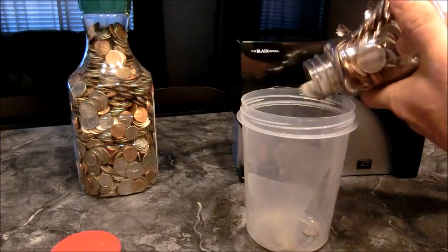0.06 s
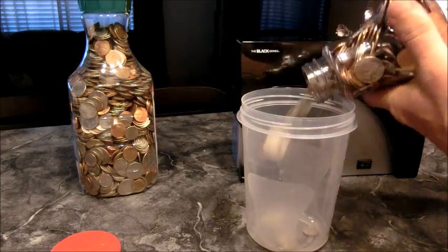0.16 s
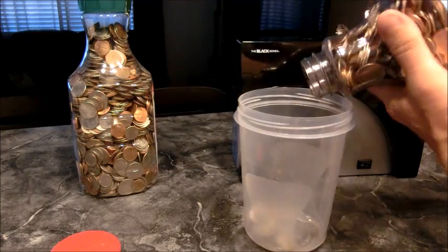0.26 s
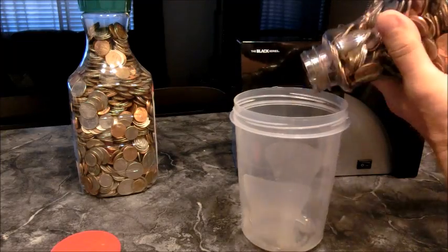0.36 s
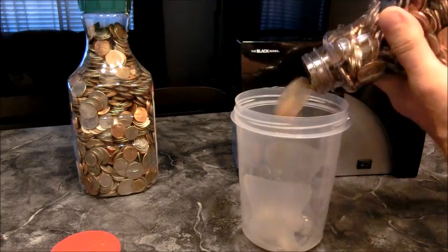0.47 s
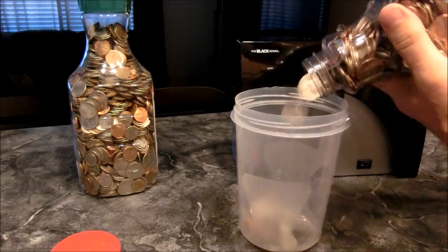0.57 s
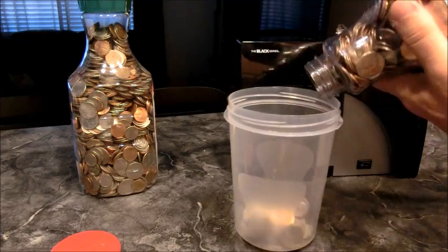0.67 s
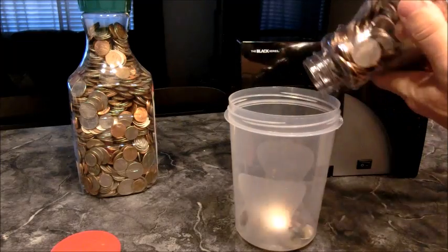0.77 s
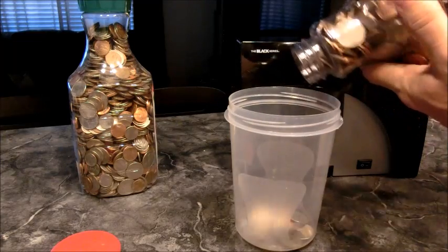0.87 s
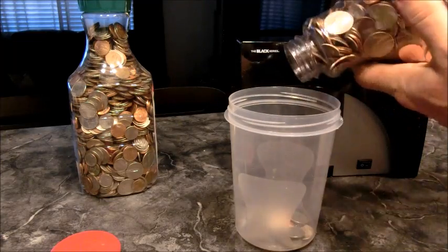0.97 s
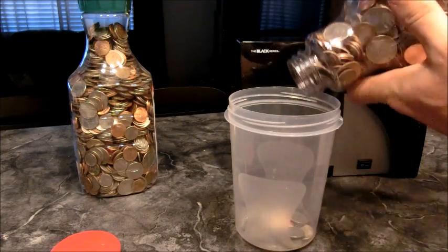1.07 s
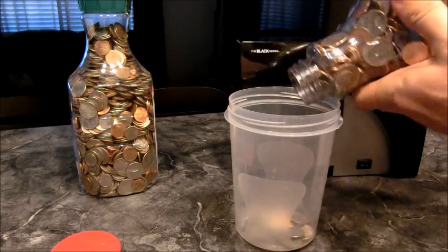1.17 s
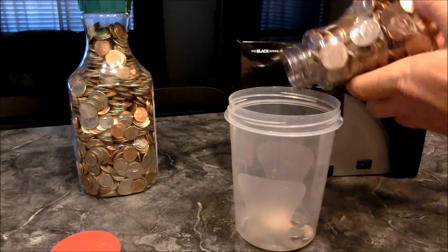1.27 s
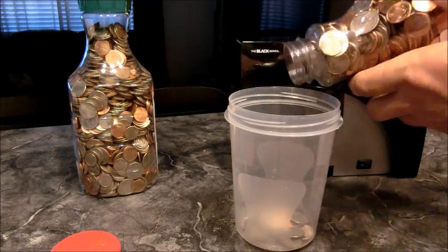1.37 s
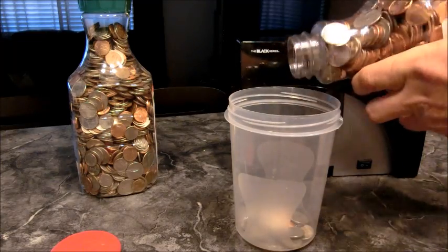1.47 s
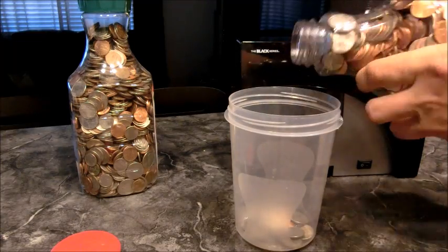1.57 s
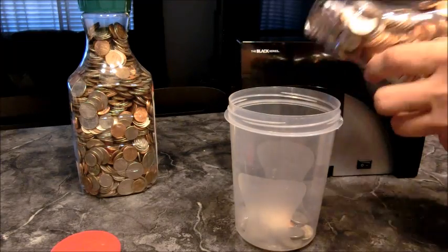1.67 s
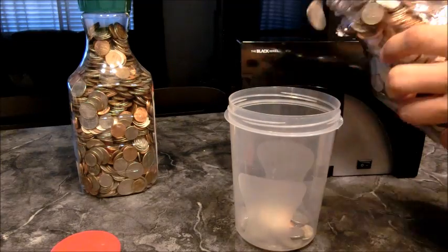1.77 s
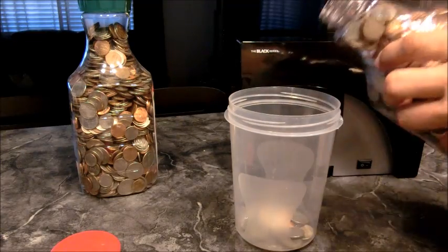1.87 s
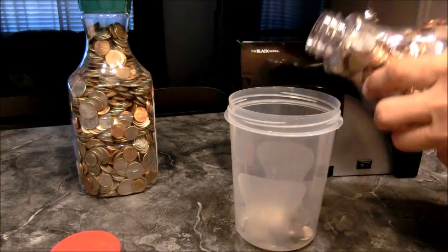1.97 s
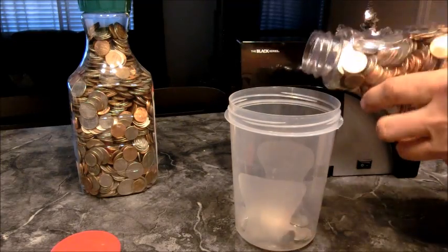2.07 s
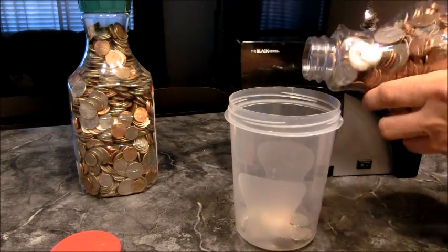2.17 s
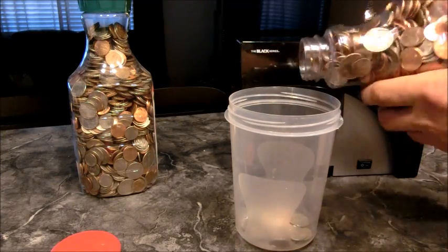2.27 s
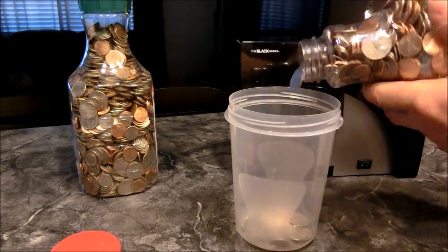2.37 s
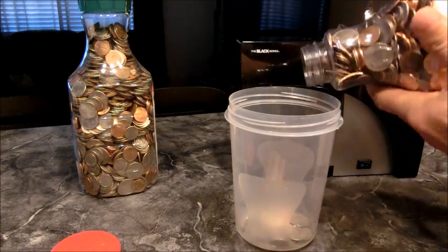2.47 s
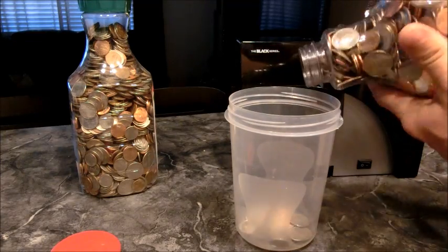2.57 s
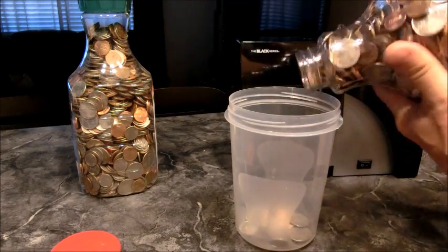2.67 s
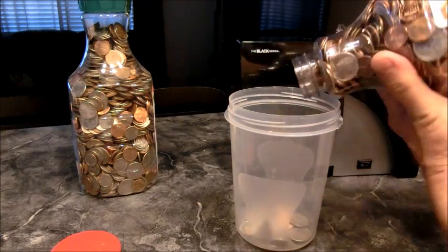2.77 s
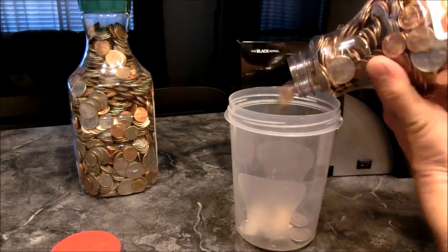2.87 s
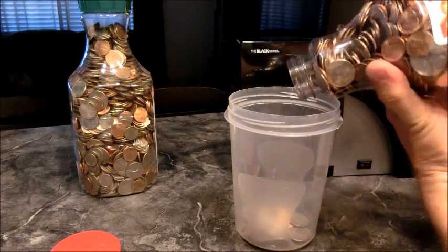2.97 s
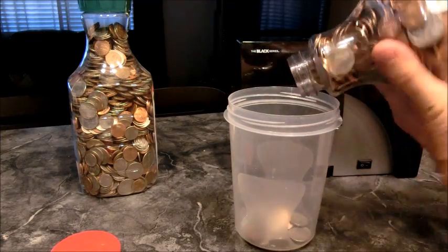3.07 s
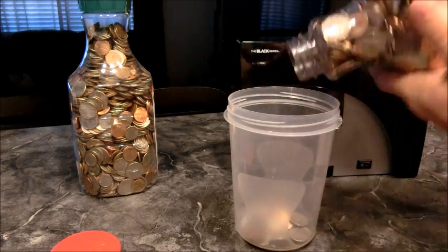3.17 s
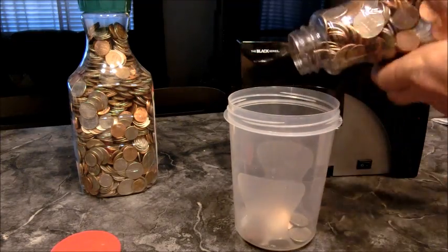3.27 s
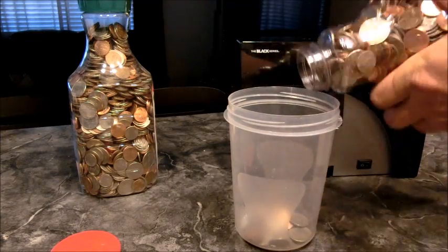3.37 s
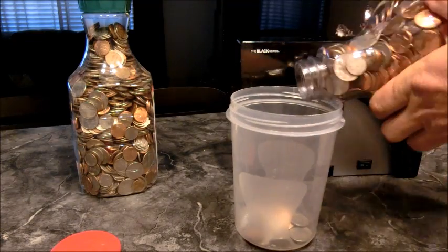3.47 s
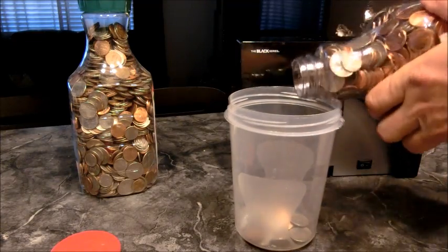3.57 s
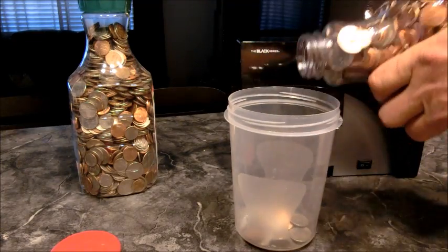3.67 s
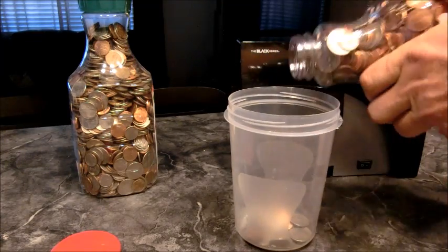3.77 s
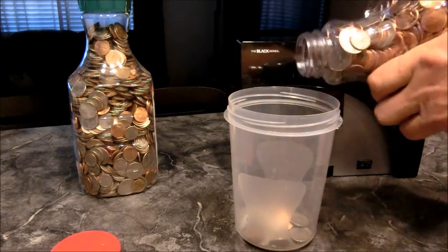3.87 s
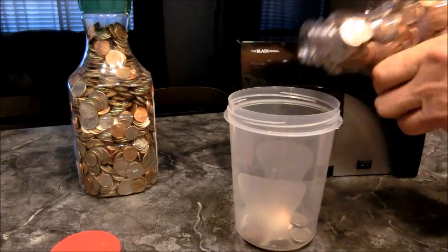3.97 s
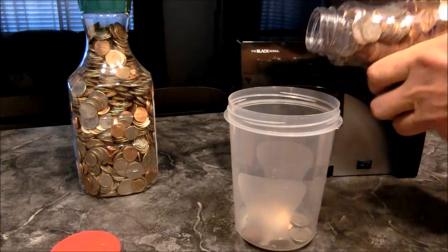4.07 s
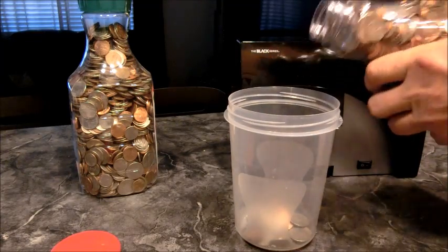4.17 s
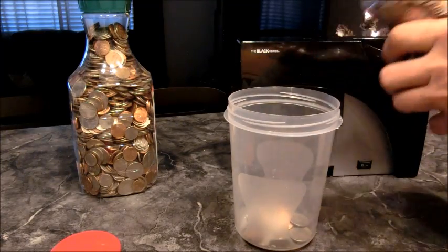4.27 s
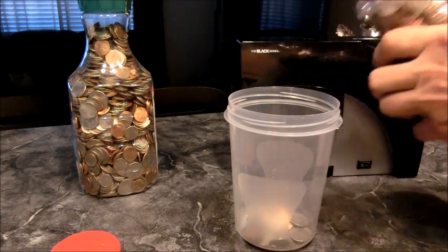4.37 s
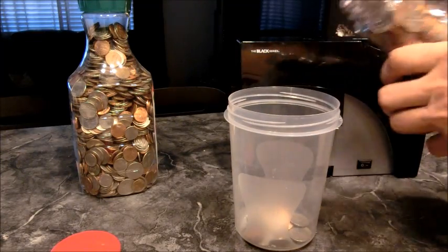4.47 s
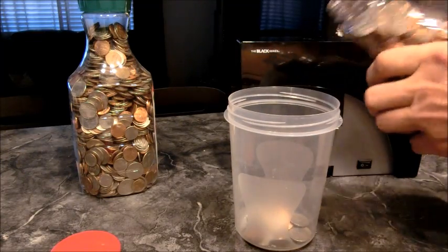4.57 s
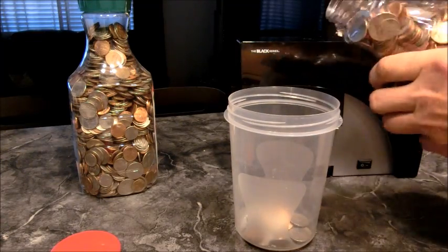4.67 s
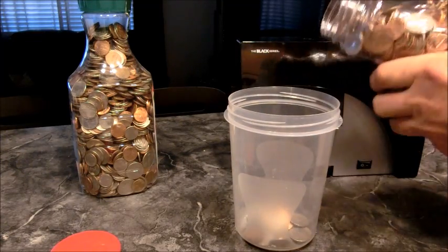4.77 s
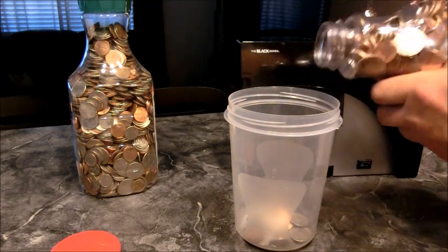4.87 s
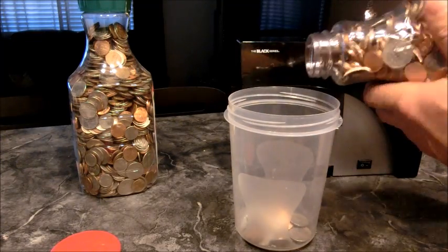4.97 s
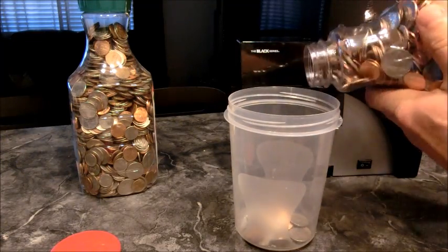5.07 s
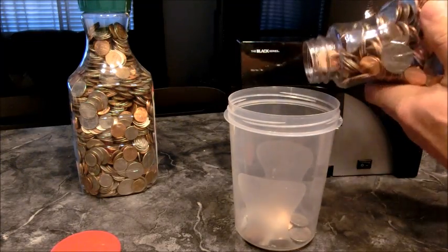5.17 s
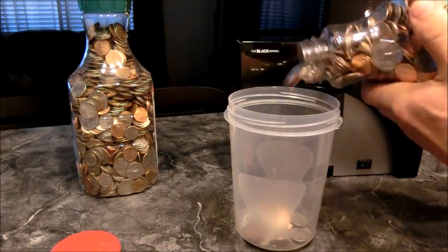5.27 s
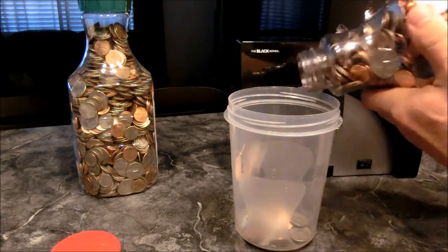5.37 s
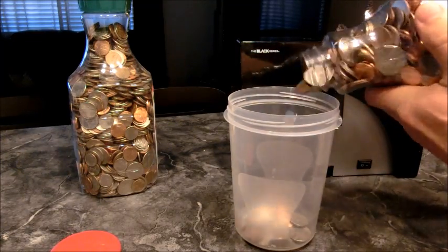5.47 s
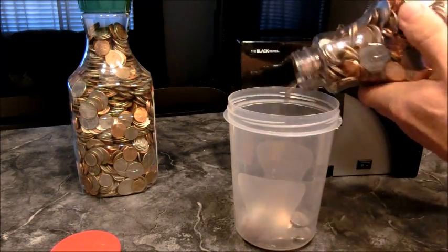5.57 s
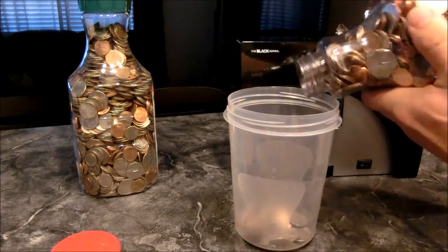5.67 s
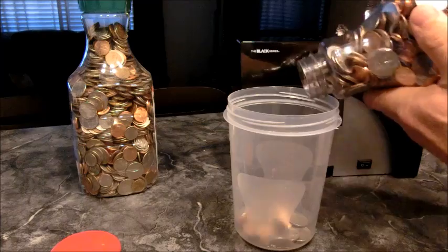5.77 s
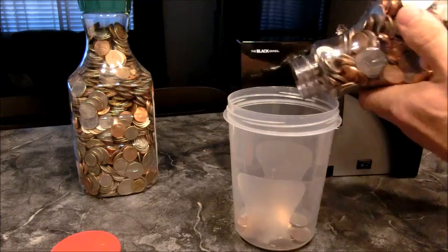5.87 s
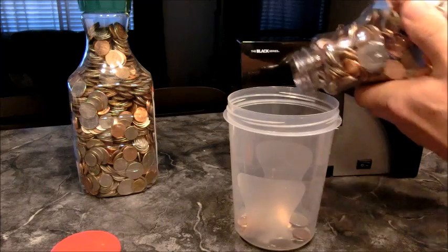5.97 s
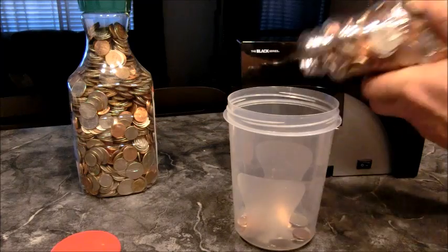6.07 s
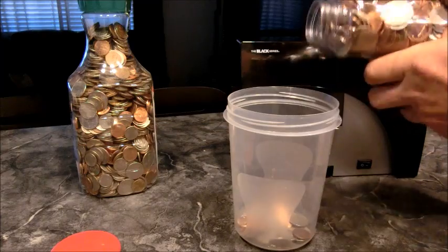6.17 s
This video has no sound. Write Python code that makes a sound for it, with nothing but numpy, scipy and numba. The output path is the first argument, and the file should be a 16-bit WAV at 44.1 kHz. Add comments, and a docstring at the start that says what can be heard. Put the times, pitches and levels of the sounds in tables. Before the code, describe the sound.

Close stereo sound in a small kitchen, with quick reflections, a short tail and very faint room noise. From 0 s packed coins grind in a plastic bottle with hard, pitched rim clanks; at about 0.24 s a loud cluster hits a plastic tub, bright clicks over a drum-like thud, then chatters with thin high ringing until about 0.95. Near quiet follows, with faint ticks from 1.15 and soft hollow sliding around 1.65-1.9. One sharp coin lands at 1.94. Light shifting leads to small drops at 2.5, 2.85 and 2.97-3.2. From 3.3 coins slide and knock in the bottle, growing to a dense rattle at 4.3-4.65, with a clank at 4.6. After a lull, rattling resumes at 4.95, clanks strongly at 5.17, and thumps the wall. A loud spill at 5.41 scatters clicks and rings until 5.83, then quiet sliding fades out.

```python
"""Coins shaken from a bottle into a tub

Coins are shaken in spurts from a plastic bottle into a plastic tub on a kitchen counter, close to a stereo phone.
Contacts mix damped noise bursts (metal click, wall clack) with decaying modes (thud, wall, thin coin ring).
Coins land, chatter and settle in the tub; between spurts the packed coins slide and knock in the bottle.
Rims clank, the load thumps the wall and free coins sing, over quick echoes, a short room tail and faint noise."""
import sys
import numpy as np
from scipy import signal
from scipy.fft import rfft, irfft, next_fast_len
from scipy.io import wavfile
from numba import njit

SR = 44100
rng = np.random.default_rng(int(sys.argv[2]) if len(sys.argv) > 2 else 0)


def put_to_file(sound):
    """Save the sound as 16-bit audio at rate SR, in the file named by the first command-line argument."""
    columns = np.atleast_2d(sound).T  # one column per channel
    safe = np.clip(columns, -1, 1)
    whole_steps = np.round(safe * 32767)
    wavfile.write(sys.argv[1], SR, whole_steps.astype(np.int16))


N = 273861  # length in samples
CLOCK = np.arange(0, N / SR, .001)  # times of the level curves, s

# coins landing or toppling in the tub, and at the end light knocks as the bottle's neck meets the tub's rim,
# levels before the trims of each part: t/s, click level/dB, floor thud re click/dB, wall clack re click/dB,
# first rebound re blow/dB
LANDING_TABLE = [(0.2353, 13.5, -6, -5.5, -27), (0.2453, 9.5, -36, -16, -29), (0.2523, -1, 0, -1, -14),
                 (0.2758, 9.5, -1.5, -11.5, -27), (0.2828, -1, -10, -5, -20), (0.3088, 0, -4, -16, -7),
                 (0.3197, -5, -0.5, -1.5, -3.5), (0.3447, 3.5, -7, -7.5, -17), (0.358, -6.5, -10, -2, -2.5),
                 (0.388, -6, -4, -8, -2), (0.414, -2.5, -1, -4, -6), (0.471, -8, -14, -11, -8),
                 (0.48, -7.5, -0.5, 2.5, -7.5), (0.536, -4, 2.5, 0.5, -1), (0.5474, 7.5, -19, -10, -5.5),
                 (0.5531, 3.5, -8, -8, -10), (0.577, -5, 3.5, -4, 0.5), (0.615, -11.5, 0, -13, 10.5),
                 (0.661, 6, -2, -1.5, -10.5), (0.7207, 5.5, -20, -9.5, -13), (0.7543, -8, -15, -35, 0),
                 (0.888, -12, -20, -9, -1.5), (0.923, -11.5, -18, -9, -7.5), (0.954, -16.5, -12, -5, -20),
                 (1.9365, 10, -27.5, -15, -15.5), (1.993, -10.5, -15, -11, -2), (2.048, -8, -9, -29, -7),
                 (2.4993, -2, -23, -11, -3), (2.505, 4.5, -18, -17, -12), (2.511, 0.5, -15, -10, -21),
                 (2.556, -10, -12.5, -16, 1.5), (2.672, -7, -21, -9.5, -5.5),
                 (2.8463, 5.5, -9.5, -22.5, -9.5), (2.932, -3.5, -15, -22, -10),
                 (2.9582, -10.5, -14, -8, -12), (2.9692, 10, -18.5, -17.5, -9.5),
                 (3.001, 6.5, -11, -14, -14.5), (3.162, -2.5, -20, -11.5, -7), (3.174, -0.5, -27, -19, -23),
                 (3.451, -6.5, 0, -4, -5), (5.4107, 14.5, -18, -12.5, -17), (5.418, 9.5, -26, -14, -23),
                 (5.425, 2, -21, -22, -39), (5.491, -13.5, -11, -9, 6.5), (5.5553, 1, -16, -4.5, -8),
                 (5.562, 5, -21, -10.5, -11), (5.625, -2.5, -19, -11, -3), (5.634, 0, -26, -7.5, -8),
                 (5.686, -5.5, -23, -31, 4.5), (5.702, 4.5, -32, -25, -14), (5.7675, 6.5, -23, -19, -10),
                 (5.831, -10, -18, -14, -1), (6.105, -27.5, 14.5, 2, -26), (6.143, -30.5, 8, -6.5, 5.5),
                 (6.188, -28.5, 4, -2, -2)]


def undb(db):
    """Level definition: decibels to amplitude gain."""
    return 10 ** (np.asarray(db) / 20)


def unit(x):
    """Energy normalisation: scale responses to unit energy, averaged over the two channels."""
    return x / np.sqrt(np.mean(np.sum(x ** 2, axis=-1, keepdims=True), axis=-2, keepdims=True))


def fade(t, t60):
    """Exponential decay of a damped vibration, 60 dB down after t60."""
    return np.exp(-np.log(1000) * t / t60)


def colour(x, points):
    """Minimum-phase (causal) filtering to the given spectrum of (f/Hz, level/dB)."""
    n = next_fast_len(x.shape[-1], True)
    hz, db = np.transpose(points)
    curve = np.interp(np.log(np.fft.rfftfreq(n, 1 / SR) + 1), np.log(hz), db)
    # folding the cepstrum onto positive times gives the causal phase
    cepstrum = irfft(np.log(undb(curve)), n)
    cepstrum[1:n // 2] *= 2
    cepstrum[n // 2 + 1:] = 0
    return irfft(rfft(x, n) * np.exp(rfft(cepstrum)), n)[..., :x.shape[-1]]


def pair(side_db, size, count):
    """Partial coherence: stereo noises with a share of opposite sign in left and right."""
    mid, side = rng.standard_normal((2, count, 1, size))
    return mid + undb(side_db) * side * np.array([[1], [-1]])


@njit
def scatter(starts, sizes, picks, bank):
    """Superposition: add one of the bank's responses at every contact."""
    out = np.zeros((2, N))
    for k in range(len(starts)):
        for c in range(2):
            for i in range(min(bank.shape[2], N - starts[k])):
                out[c, starts[k] + i] += sizes[k] * bank[picks[k], c, i]
    return out


def cracks(points, t60, side_db, rise_s):
    """Heavy damping: a bank of short noise bursts, no two alike; a blow takes a moment to spread through the coins."""
    noise = pair(side_db, size=2048, count=96)
    t = np.arange(noise.shape[-1]) / SR
    envelope = (1 - np.exp(-t / rise_s)) * fade(t, t60)
    return unit(colour(noise * envelope, points))


def rings(modes, detune, uneven_db, port_phase, size, count):
    """Modal synthesis: each contact point weights the modes anew; touching neighbours detune and damp them."""
    t = np.arange(size) / SR
    bank = 0
    for hz, db, t60 in modes:
        pitch, weight, damping, angle = rng.standard_normal((4, count, 1, 1))
        shifted_hz = hz * np.exp(detune * pitch)
        phase = 2 * np.pi * shifted_hz * t + port_phase * angle * np.array([[1], [-1]])
        level = undb(db + uneven_db * weight)
        bank = bank + level * fade(t, t60 * np.exp(.25 * damping)) * np.sin(phase)
    return unit(bank)


def play(times, levels_db, banks):
    """Superposed parts: every contact draws a response from each bank, each at its own level."""
    starts = np.clip(times * SR, 0, N - 1).astype(np.int64)
    picks = rng.random((len(times), len(banks))).T
    sound = 0
    for db, pick, bank in zip(levels_db, picks, banks):
        sound = sound + scatter(starts, undb(db), (pick * len(bank)).astype(np.int64), bank)
    return sound


def blows(table, banks, click_db, thud_db, clack_db, ring_db, gap_s, loss_db, count):
    """Inelastic rebound: a coin strikes and hops on, each gap on average shorter, each later hop loss_db weaker."""
    ring_choke = .3  # a harder blow presses the coin into its neighbours: dB of ring lost per dB of blow
    s, peak, thud, clack, rebound = np.transpose(table)[:, :, None]
    hop = np.arange(count)
    gaps = gap_s * .85 ** hop * rng.uniform(.5, 1.5, (len(s), count))
    times = s + np.cumsum(gaps, axis=1) - gaps
    force = peak + (hop > 0) * (rebound - loss_db * (hop - 1))
    parts = (click_db, thud + thud_db, clack + clack_db, ring_db - ring_choke * peak)
    return play(times.ravel(), [(force + part).ravel() for part in parts], banks)


def rattle(levels_db, banks, trims_db, uneven_db, count):
    """Random impact train: count small contacts a second, many faint and a few strong; rings follow the click level."""
    slot, strength = rng.random((count * N // SR, 2)).T
    t = (np.arange(len(slot)) + 2 * slot) / count
    force = -uneven_db * np.log(.03 + strength)
    # bring the mean power of the train to 0 dB
    force -= 10 * np.log10(np.mean(undb(force) ** 2) * count / SR)
    click, thud, clack = (np.interp(t, CLOCK, db) for db in levels_db)
    heard = click + trims_db[0] > -85  # skip contacts too faint to matter
    levels = [(force + trim + db)[heard] for db, trim in zip((click, thud, clack, click), trims_db)]
    return play(t[heard], levels, banks)


def from_right(x, lag_samples):
    """Time difference of arrival: sound from the right reaches the left port a little later."""
    n = next_fast_len(N + SR // 10, True)
    delay = np.exp(-2j * np.pi * np.fft.rfftfreq(n) * lag_samples)
    late = irfft(rfft(x[0], n) * delay, n)[:N]
    return np.array([late, x[1]])


def air():
    """Stationary coloured noise: the faint quiet kitchen, partly incoherent between the two ports."""
    # relative noise spectrum of the kitchen: f/Hz, level/dB
    air_colour = [(25, 4), (45, 9), (60, 12.5), (85, -5.5), (125, 11), (200, -3), (500, -12), (1300, -7),
                  (1520, 2), (1800, -9), (4000, -7), (16000, -26)]
    level_db = -63.5  # rms re full scale
    noise = pair(side_db=-2, size=N, count=1)[0]
    return undb(level_db) * np.sqrt(N) * unit(colour(noise, air_colour))


def reflections(x, t60, size):
    """Early reflection off counter and vessels; coins and bottle move, so patterns crossfade every size samples."""
    t = np.arange(size) / SR
    x = np.pad(x, ((0, 0), (size, 2 * size)))
    out = np.zeros((2, N + 4 * size))
    for start in range(0, N + size, size):
        paths = unit(rng.standard_normal((2, size)) * fade(t, t60) * (t > .0015))
        piece = x[:, start:start + 2 * size] * np.hanning(2 * size)
        out[:, start:start + 3 * size - 1] += signal.fftconvolve(piece, paths, axes=1)
    return out[:, size:size + N]


def kitchen(x, early_db, early_t60, late_db, late_t60, treble_t60):
    """Reverberation: quick reflections off the counter and nearby things, then a tail shorter in the treble."""
    # spectrum of the kitchen's echo: f/Hz, level/dB
    room_colour = [(60, 11.5), (300, -4), (600, -4), (1200, -2.5), (4000, 0), (9000, 2.5), (16000, -2)]
    t = np.arange(SR * 2 // 3) / SR
    far = rng.standard_normal((2, len(t)))
    low = signal.sosfilt(signal.butter(2, 5000, fs=SR, output="sos"), far)
    high = signal.sosfilt(signal.butter(2, 5000, "high", fs=SR, output="sos"), far)
    # the minus keeps the two bands in phase where they cross
    tail = unit((low * fade(t, late_t60) - high * fade(t, treble_t60)) * (t > .007))
    late = signal.fftconvolve(x, tail, axes=1)[:, :N]
    early = reflections(x, early_t60, size=1024)
    return x + colour(undb(early_db) * early + undb(late_db) * late, room_colour)


def hand():
    """Damped low-frequency impact: dull bumps as the heavy bottle's load shifts in the grip."""
    # soft bumps: t/s, level/dB
    bump_table = [(0.024, -21.5), (.12, -23), (1.937, -23), (4.6, -30), (4.702, -28), (5.415, -26)]
    # their spectrum: f/Hz, level/dB
    bump_colour = [(25, -8), (60, -4), (135, 1.5), (310, -2), (480, -20), (1200, -55)]
    s, db = np.transpose(bump_table)
    return play(s, [db], [cracks(bump_colour, t60=0.055, side_db=-22, rise_s=0.0017)])


def rims():
    """Modal response of a stiff plastic rim: a hard edge-on blow gives a short, pitched clank."""
    # hard blows: t/s, level/dB
    clank_table = [(0.0273, -7), (0.104, -13), (0.144, -3.5), (0.181, -6.5), (0.2365, 2), (2.847, -15),
                   (4.431, -20), (4.611, -4.5), (5.098, -11), (5.1705, 0.5), (5.173, 0), (5.1754, 0),
                   (5.77, -19)]
    # modes of such a rim: f/Hz, level/dB, T60/s
    rim_modes = [(2430, -3, 0.033), (2582, 3, 0.048), (3200, -1, 0.036), (3660, 1, 0.026),
                 (4030, 1.5, 0.015), (4620, 4, 0.017), (6270, 4.5, 0.018), (6270, -2.5, 0.022),
                 (6900, 4, 0.023)]
    s, db = np.transpose(clank_table)
    bank = rings(rim_modes, detune=.025, uneven_db=3, port_phase=.4, size=4096, count=32)
    return from_right(play(s, [db], [bank]), lag_samples=0.77)


def thumps(t60, rise_s):
    """Damped oscillation: the bottle's wall gives under the shifting load and swings for a few cycles."""
    # thumps, whose pitch depends on where the coins lie: t/s, f/Hz, level/dB before the rise and decay
    thump_table = [(1.652, 420, -40), (2.314, 360, -47), (3.574, 170, -40), (4.024, 300, -25.5),
                   (4.143, 403, -40), (5.095, 720, -27), (5.171, 536, -27), (5.238, 477, -31.5),
                   (5.293, 483, -29.5), (5.335, 450, -33), (5.376, 443, -24), (5.411, 430, -25),
                   (6.187, 472, -38)]
    t = np.arange(SR // 8) / SR
    s, hz, db = np.transpose(thump_table)
    swing = (1 - np.exp(-t / rise_s)) * fade(t, t60) * np.sin(2 * np.pi * hz[:, None] * t)
    both_ports = np.stack([swing, swing], axis=1)
    return scatter((s * SR).astype(np.int64), undb(db), np.arange(len(s)), both_ports)


def chimes(ring_t60, split, twin_db):
    """Split plate modes: a free coin sings in two beating pairs, split by its stamping, blurred by its wobbling edge."""
    # coins that spin or fly free: t/s, low mode f/Hz, level/dB, high mode f/Hz, level/dB, time free/s
    chime_table = [(0.028, 9040, -37, 15270, -35, 0.16), (.085, 9220, -31, 15200, -32, 0.082),
                   (.11, 9500, -27, 15100, -34, 0.16), (.16, 9360, -28, 15200, -34, 0.12),
                   (0.2437, 9030, -25.5, 15400, -18, 0.04), (.28, 9170, -35, 15050, -23, 0.12),
                   (.345, 9070, -35, 14800, -45, 0.17), (0.554, 8900, -37, 15000, -19, 0.11),
                   (.58, 9300, -30, 15100, -31, 0.11), (.661, 9300, -27.5, 15500, -28, 0.15),
                   (.721, 9200, -33, 14700, -23, 0.13), (.889, 9500, -36, 14900, -35, 0.09),
                   (2.505, 9250, -30, 15000, -21, 0.039), (2.54, 9290, -29.5, 15670, -34, 0.13),
                   (2.931, 13050, -39, 15670, -40, 0.052), (2.969, 9600, -22, 15200, -24, 0.019),
                   (3.001, 9300, -31.5, 14900, -31, 0.064), (3.17, 9330, -33.5, 14600, -29, 0.042),
                   (5.418, 9400, -38, 15140, -20, 0.076), (5.561, 12000, -32.5, 15200, -21, 0.087),
                   (5.699, 9530, -28.5, 14700, -40, 0.056), (5.768, 13000, -33.5, 14900, -33, 0.14)]
    width_hz = 55  # blur of each line, from a random walk of its phase
    t = np.arange(SR // 3) / SR
    s, low_hz, low_db, high_hz, high_db, free_s = np.transpose(chime_table)[:, :, None, None]
    free = np.exp(-(t / free_s) ** 4)  # rings until it lies down
    sound = 0
    for hz, db, t60 in ((low_hz, low_db, ring_t60), (high_hz, high_db, 0.83 * ring_t60)):
        steps = rng.standard_normal((len(s), 2, len(t)))
        wobble = np.cumsum(steps, axis=-1) * np.sqrt(2 * np.pi * width_hz / SR)
        main = np.sin(2 * np.pi * hz * t + wobble[:, :1])
        # the twin mode radiates in another direction, so the two ports hear different beats
        twin = np.cos(2 * np.pi * hz * (1 + split) * t + wobble[:, 1:]) * np.array([[1], [-1]])
        sound = sound + undb(db) * free * fade(t, t60) * (main + undb(twin_db) * twin)
    starts = (s.ravel() * SR).astype(np.int64)
    return from_right(scatter(starts, np.ones(len(s)), np.arange(len(s)), sound), lag_samples=1.0)


def stick_slip():
    """Stick-slip friction: packed coins catch and let go, so their level jumps at random times and holds between."""
    jump_db, jumps_per_s = 1.8, 110  # spread of the levels (limited to twice this), mean rate
    holds = np.cumsum(rng.random(len(CLOCK)) < jumps_per_s * CLOCK[1])
    return jump_db * np.clip(rng.standard_normal(len(CLOCK) + 1), -2, 2)[holds]


def sliding_levels():
    """Friction power: click, thud and clack levels of the sliding rise and fall, silent in the longer gaps."""
    # stretches of the coins' sliding level in the bottle, one curve each, before stick-slip and trims:
    # t/s, grinding level/dB, wall thud level/dB
    sliding_table = [
        [(0.0, -31, -51.5), (0.055, -38.5, -61), (0.136, -33.5, -59), (0.22, -53, -66)],
        [(1.0, -88.5, -80), (1.056, -75, -76), (1.21, -75, -82), (1.285, -58.5, -70), (1.36, -57, -75),
         (1.49, -76, -79), (1.625, -72, -78)],
        [(1.625, -58, -69), (1.662, -54, -63.5), (1.796, -42, -56.5), (1.856, -51, -66), (1.93, -53, -65)],
        [(2.1, -55, -79.5), (2.16, -43.5, -69), (2.334, -55.5, -60.5), (2.47, -58, -59)],
        [(3.26, -64, -58), (3.335, -55, -54.5), (3.406, -57, -68), (3.54, -44.5, -56), (3.666, -54.5, -67.5),
         (3.808, -46.5, -53.5), (3.922, -48, -54.5), (3.968, -45.5, -52.5), (4.09, -44, -55.5),
         (4.22, -62, -70)],
        [(4.235, -61, -74), (4.268, -40, -49.5), (4.321, -40.5, -50.5), (4.445, -34, -50.5),
         (4.519, -34, -46.5), (4.585, -30, -47.5), (4.645, -41.5, -60.5), (4.75, -44.5, -65), (4.795, -64, -65),
         (4.87, -58, -69), (4.89, -47.5, -54), (4.94, -67, -65)],
        [(4.94, -60, -52), (5.008, -35, -52.5), (5.108, -37, -47), (5.16, -53, -55), (5.232, -39.5, -46.5),
         (5.41, -39, -51)],
        [(5.81, -54, -54), (5.87, -47, -53.5), (5.91, -45, -57.5), (5.994, -44.5, -57), (6.21, -59, -66.5)],
    ]
    clack_share = 0.33  # the clack lies this far from the grinding level towards the thud level
    stretches = [np.transpose(stretch) for stretch in sliding_table]
    click, thud = (
        np.max([np.interp(CLOCK, part[0], part[k], left=-120, right=-120) for part in stretches], axis=0)
        for k in (1, 2))
    catch = stick_slip()
    click, thud = click + catch, thud + catch / 2
    return click, thud, click + clack_share * (thud - click)


@njit
def resonance(x, hz, width):
    """State-variable resonator: band-pass with a moving centre and a width relative to it."""
    y, b, l = np.empty(len(x)), 0., 0.
    for i in range(len(x)):
        g = np.tan(np.pi * hz[i] / SR)
        v = (b + g * (x[i] - l)) / (1 + g * (g + width))
        b, l, y[i] = 2 * v - b, l + 2 * g * v, width * v
    return y


def scrape(level_db, trim_db, uneven_db, count):
    """Source and resonator: count tiny slips a second drive the hollow, drifting resonance of the wall."""
    # the resonance drifts as the load of coins shifts along the wall, one curve per stretch: t/s, f/Hz
    wall_pitch = [
        [(1.65, 458), (1.678, 460), (1.778, 1090), (1.792, 940), (1.92, 1200)],
        [(2.1, 534), (2.142, 546), (2.196, 1050), (2.3, 549.7), (2.47, 796)],
        [(3.25, 550), (3.324, 1273), (3.482, 525), (3.516, 1250), (3.62, 632)],
        [(3.7, 776), (3.8, 950), (3.95, 680), (4.128, 760), (4.156, 541), (4.2, 698)],
        [(4.26, 807), (4.442, 1330), (4.48, 980), (4.568, 1270), (4.62, 1100)],
        [(4.96, 810), (5.136, 663), (5.162, 547), (5.232, 685), (5.4, 503)],
        [(5.8, 606), (5.872, 830), (5.942, 1000), (6.032, 810), (6.08, 1055)],
    ]
    width = .4  # of each resonator, relative to its centre
    hz = np.interp(np.arange(N) / SR, *np.concatenate(wall_pitch).T)
    where, force, sign = rng.random((3, count * N // SR))
    pulses = np.sign(sign - .5) * undb(-uneven_db * np.log(1 - force))
    slips = np.bincount((where * N).astype(np.int64), pulses, N)
    hollow = resonance(resonance(slips, hz, width), hz, width) / np.sqrt(hz)
    return hollow / np.std(hollow) * undb(np.interp(np.arange(N) / SR, CLOCK, level_db) + trim_db)


def bottle(coins):
    """Friction and impact under damping: packed coins grind and knock, damped by the hand and their neighbours."""
    # coins dropping against wall and neck, levels before the trims of each part:
    # t/s, click level/dB, bottle thud re click/dB, wall clack re click/dB, first rebound re blow/dB
    knock_table = [(0.029, 5.5, -15, -7.5, -33), (0.0495, -12, -23, 0, -14), (0.0575, -5, -21, -10, -18),
                   (0.081, -7.5, -33, -1.5, -6), (0.103, -2, -35, -3, -9), (0.1432, 2.5, -30, -16, -21),
                   (0.181, -10, -37, -16, -2), (0.22, -16.5, 5.5, 6, -26), (1.153, -33, -16, -1, -27),
                   (1.186, -38, -13, -1, -20), (1.24, -33, -12, -1, -6), (1.283, -26.5, -4, -1, -20),
                   (1.312, -32, -10, 0, -9), (1.375, -27, -6, -2, -13), (1.462, -29, -20, -11, -23),
                   (1.528, -34, -4, -1, -4), (1.557, -31.5, -16, 0.5, -14), (1.603, -28, -18, -12, -2),
                   (1.633, -10, -10.5, -2, -27), (1.655, -23.5, 0, 1, -15), (1.89, -21, -26, 5, -21),
                   (2.136, -16.5, -11, -11.5, -0.5), (2.174, -10.5, -13, -5.5, -4.5),
                   (2.216, -16, -18, -22, -4.5), (2.314, -21, -2, -20.5, -5), (2.441, -21.5, -10, -9, -4),
                   (2.765, -15, -14, -5.5, -5), (2.7965, -11.5, -18, -5, -13), (3.307, -27, -7, 2.5, -7),
                   (3.375, -23.5, -36, 5.5, -31), (3.431, -19, -3.5, -4, -10),
                   (3.513, -29.5, -19, 2.5, 4.5), (3.778, -21.5, 3, 3.5, -22),
                   (3.741, -14.5, -23, -6.5, -7), (3.832, -13.5, -20, -14, -16), (3.856, -16, -21, -12, -5),
                   (3.889, -16.5, -20, -4, -5), (3.938, -14.5, -4.5, -9, -8.5), (4.007, -11, -8, -3, -6),
                   (4.0238, -4.5, 1.5, -2.5, -14), (4.058, -14, -22, -10, -21), (4.09, -9, -24, -12, -21),
                   (4.12, -13.5, -15, -6.5, -25), (4.308, -11.5, -24, -1.5, -12),
                   (4.342, -20.5, 6.5, -9, -14), (4.393, -11.5, -19, -0.5, -5.5),
                   (4.419, 1, -48, -2.5, -16), (4.4295, 0, -37, 0.5, -28), (4.436, -1, -33, -6.5, -28),
                   (4.46, -10, -10, -4, -11), (4.483, -6.5, -14, -4.5, -4.5), (4.4975, 1, -24, -13, -10),
                   (4.557, -5.5, -31, -3.5, -1.5), (4.6015, -2, -28, -2.5, -11.5),
                   (4.6105, -1, -33, -7, -5), (4.677, -12, -18, -18, -18), (4.83, -27.5, -8, -2, -4),
                   (4.89, -22, -14, -8, -23), (4.919, -32, -16, 4, -16), (4.954, -10.5, -8, 2, -28),
                   (4.997, -19.5, 4, -11, -19), (5.0745, -5, -5, -15, -31), (5.096, -7, -7, -3, -14),
                   (5.1125, -4.5, -25, -5.5, -14), (5.127, -7, -27, -11, -20), (5.1585, -1, -23, -9, -22),
                   (5.1703, 0.5, -14, -6.5, -22), (5.175, 0.5, -20, -12, -24), (5.229, -1, -14, -18, -6),
                   (5.338, -16, 5, -15, -10), (5.366, -7.5, -9, -6, -14), (5.3745, -2, -6.5, -3.5, -4.5),
                   (5.395, 1, -35, -4, -12), (6.19, -25, 6, -4, -2)]
    # spectra of one contact's click, clack and thud: f/Hz, level/dB
    click_colour = [(1500, -64), (4000, -3), (5500, -2.5), (8200, 0), (9600, 6.5), (11000, 7.5),
                    (11800, 4.5), (13100, 10.5), (14400, 2.5), (15200, 0), (16000, -10)]
    clack_colour = [(400, -13.5), (800, -8), (1300, -5.5), (1800, 0.5), (2550, 1.5), (3300, 1), (4200, -2),
                    (7000, -7.5), (14000, -14)]
    thud_colour = [(30, -3), (80, -35), (140, -6.5), (220, -15), (320, -5), (480, 1), (720, -0.5),
                   (1100, -7), (2500, -22.5)]
    # wall modes, shifted by the coins that lean on it: f/Hz, level/dB, T60/s
    wall_modes = [(1100, 2.5, 0.018), (1690, 4, 0.016), (2640, 2, .011)]
    thud = cracks(thud_colour, t60=0.031, side_db=-28, rise_s=0.00093)
    click = cracks(click_colour, t60=.0037, side_db=-7, rise_s=.0005)
    clack = cracks(clack_colour, t60=.018, side_db=-8, rise_s=.0001)
    # every spot on the wall answers with its own pitch
    tock = rings(wall_modes, detune=0.245, uneven_db=2.5, port_phase=0.21, size=2048, count=96)
    knocks = blows(knock_table, (click, thud, unit(clack + 0.21 * tock), coins), click_db=0.1, thud_db=-2.0,
                   clack_db=0.17, ring_db=-13.0, gap_s=0.0045, loss_db=0.0, count=5)
    # fine grinding of face on face, and sparser slips of an edge against the wall
    sliding = sliding_levels()
    grinding = rattle(sliding, (click, thud, clack, coins), trims_db=(-1.5, -1.5, -1.0, -23),
                      uneven_db=2.5, count=900)
    slips = rattle(sliding, (click, thud, tock, coins), trims_db=(-2.0, -8, -3, -18),
                   uneven_db=4.5, count=160)
    scraping = scrape(sliding[1], trim_db=0, uneven_db=1.8, count=2500)
    return from_right(knocks + grinding + slips + scraping, lag_samples=1.95)


def settling_levels():
    """Energy addition: every landing's rebound stirs the pile, and the dying chatter of all landings adds up."""
    rise_s, decay_db_per_s = 0.0096, 135.5
    memory = 0.37  # share of a landing's relative thud and clack levels that its chatter keeps
    thud_decay_db_per_s = 27  # extra fading of the floor's thud, as the coins come to lie on each other
    s, peak, thud, clack, rebound = np.transpose(LANDING_TABLE)[:, :, None]
    age = np.maximum(CLOCK - s, 0)
    stir = (1 - np.exp(-age / rise_s)) * undb(peak + rebound - decay_db_per_s * age)
    parts = (0, memory * thud - thud_decay_db_per_s * age, memory * clack)
    return [10 * np.log10(np.sum((stir * undb(part)) ** 2, axis=0) + 1e-18) for part in parts]


def tub(coins):
    """Impact excitation of modes: loose coins land on the drum-like floor of the tub and ring as they settle."""
    # floor and wall modes: f/Hz, level/dB, T60/s
    floor_modes = [(412, -16, 0.1), (480, -4.5, 0.093), (522, 5, 0.12), (566.6, -6.5, 0.11),
                   (1477, -1, 0.039), (2110, -7, 0.02)]
    # side-wall modes, shifted by where the coin strikes: f/Hz, level/dB, T60/s
    side_modes = [(1513, -0.5, 0.028), (2238, -1.5, 0.038), (3170, -0.5, 0.02), (4300, 0.5, 0.017),
                  (5550, 0, 0.018)]
    # spectra of one contact's click and clack: f/Hz, level/dB
    click_colour = [(1500, -9.5), (4000, -7), (5500, -6.5), (7500, -4), (9400, 2.5), (11300, -0.5),
                    (13000, 0.5), (14300, 1.5), (15300, 2), (17000, 1.5)]
    clack_colour = [(250, -15), (800, 0.5), (1100, -3.5), (1520, 0.5), (1850, -2.5), (2300, 0.5),
                    (3200, 1.5), (4200, -2), (7000, -4.5), (14000, -9.5)]
    floor = rings(floor_modes, detune=.022, uneven_db=3, port_phase=.05, size=4096, count=48)
    # the high-pass removes the low skirt that abrupt sine onsets make
    floor = unit(signal.sosfilt(signal.butter(2, 240, "high", fs=SR, output="sos"), floor))
    click = cracks(click_colour, t60=.0037, side_db=-4, rise_s=.0005)
    clack = cracks(clack_colour, t60=0.023, side_db=-35, rise_s=0.00028)
    tock = rings(side_modes, detune=0.061, uneven_db=2.5, port_phase=0.26, size=2048, count=96)
    banks = (click, floor, unit(clack + tock / 2), coins)
    landings = blows(LANDING_TABLE, banks, click_db=-2.5, thud_db=-7.0, clack_db=-4.0, ring_db=-6.0,
                     gap_s=.005, loss_db=4.5, count=6)
    settling = rattle(settling_levels(), banks, trims_db=(-28.5, -34, -30.5, -29.0), uneven_db=4, count=280)
    return from_right(landings + settling, lag_samples=0.88)


def scene():
    """Superposition in one room: bottle and tub hold the same coins and sound into the same kitchen."""
    # plate modes of the mixed coins: f/Hz, level/dB, T60/s
    coin_modes = [(6400, -5, .08), (8870, -2, 0.17), (9330, 0.5, 0.2), (9840, 4, 0.14), (10600, 4, 0.099),
                  (11440, 0, 0.16), (12400, 7.5, 0.086), (13100, 12, 0.11), (13900, 7, 0.11),
                  (15400, 6.5, .16), (15400, 6, 0.16)]
    coins = rings(coin_modes, detune=.014, uneven_db=4.5, port_phase=0.8, size=8000, count=128)
    singing = chimes(ring_t60=.32, split=.006, twin_db=-5)
    close = tub(coins) + bottle(coins) + rims() + thumps(t60=0.044, rise_s=0.0014) + singing
    # the high-pass keeps the deep bass of the summed contacts and rings low
    close = signal.sosfilt(signal.butter(2, 100, "high", fs=SR, output="sos"), close) + hand()
    sound = kitchen(close, early_db=-4.5, early_t60=0.017, late_db=-9.5, late_t60=0.52, treble_t60=0.14)
    balance_db = -.5  # left re right
    return sound * undb(np.array([[balance_db], [-balance_db]]) / 2) + air()


def record(dry):
    """Clipping and band limiting: the phone clips at full scale, then cuts the top above 15750 Hz."""
    top_cut = signal.ellip(10, .2, 70, 15750, fs=SR, output="sos")
    return signal.sosfilt(top_cut, np.clip(dry, -1, 1))


dry = scene()
out = record(dry)
put_to_file(out)
```